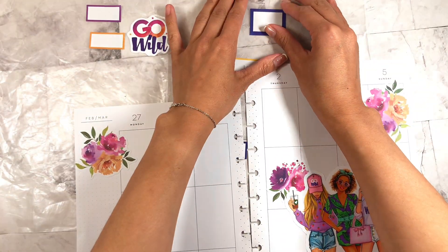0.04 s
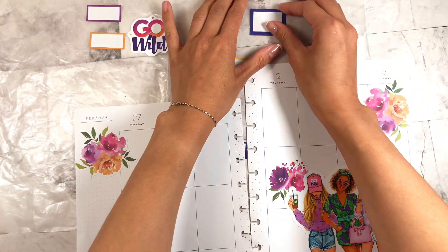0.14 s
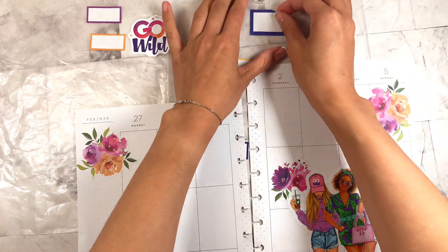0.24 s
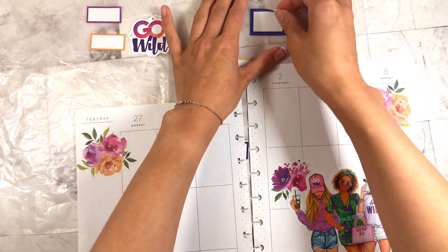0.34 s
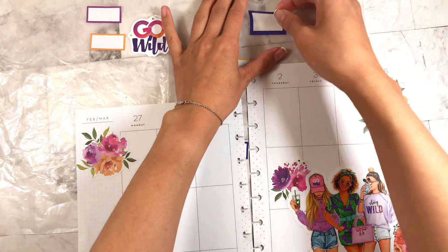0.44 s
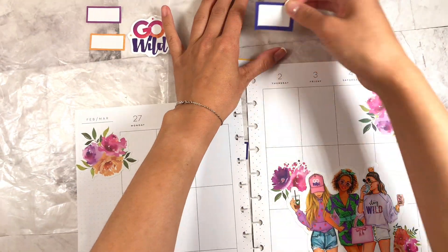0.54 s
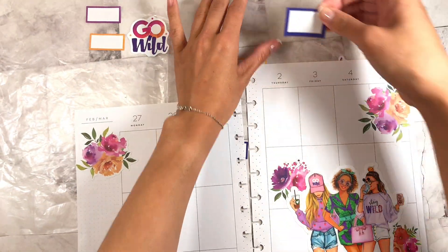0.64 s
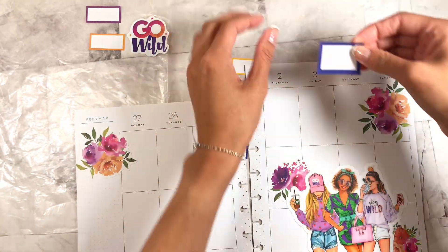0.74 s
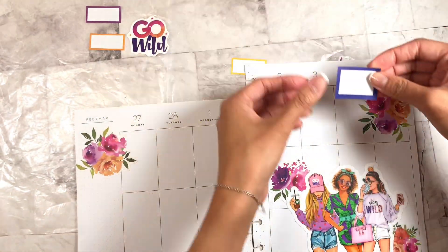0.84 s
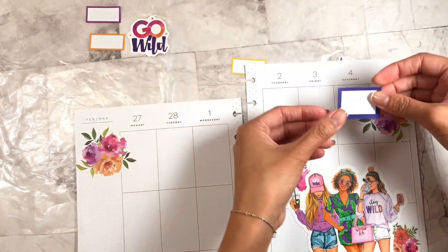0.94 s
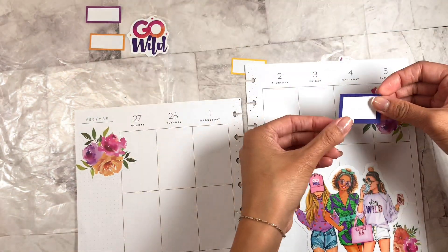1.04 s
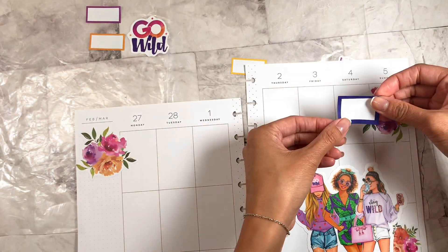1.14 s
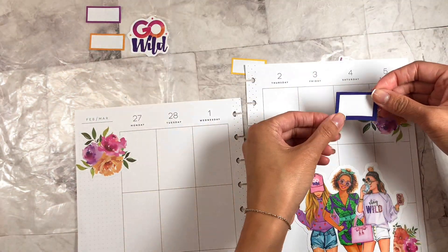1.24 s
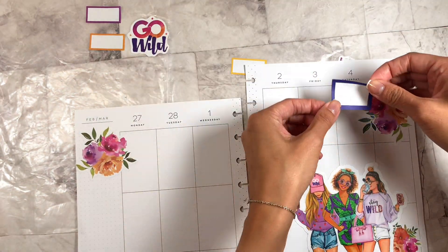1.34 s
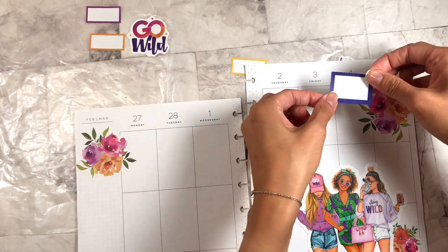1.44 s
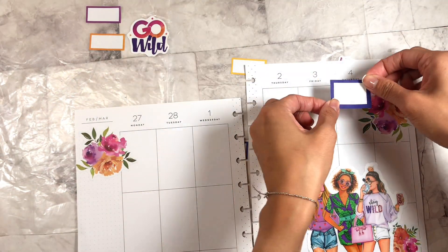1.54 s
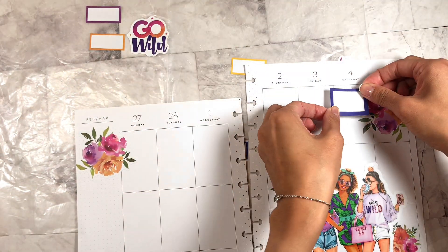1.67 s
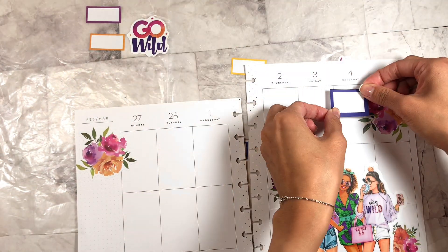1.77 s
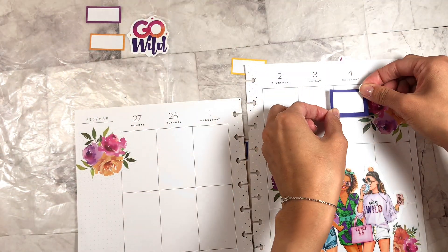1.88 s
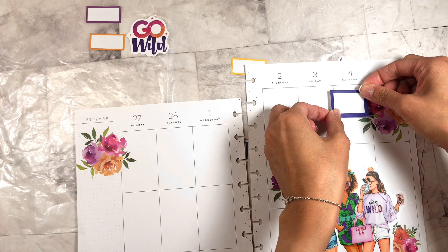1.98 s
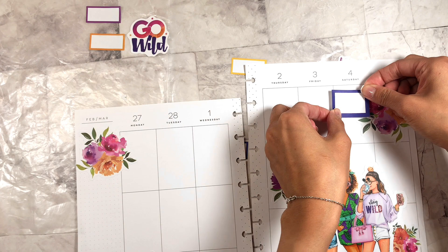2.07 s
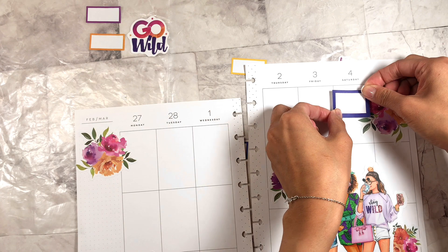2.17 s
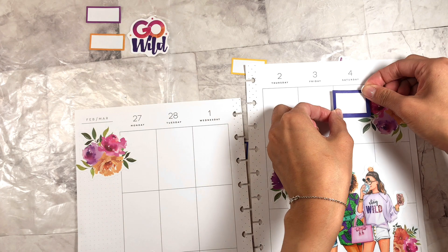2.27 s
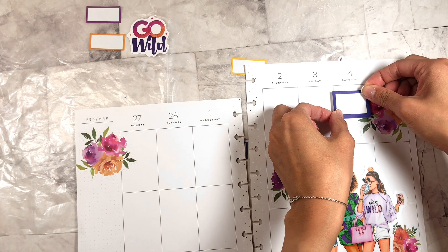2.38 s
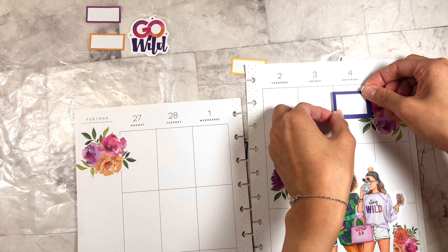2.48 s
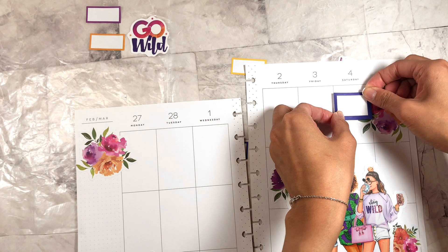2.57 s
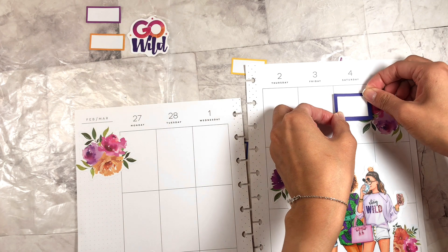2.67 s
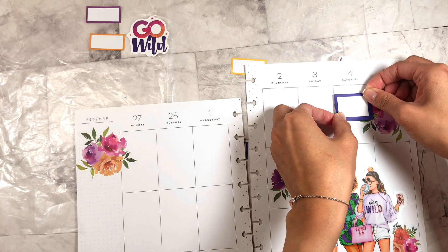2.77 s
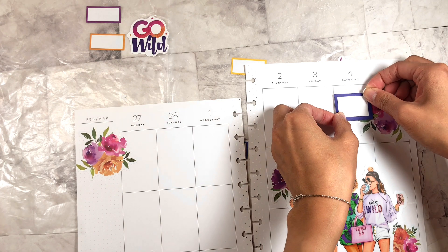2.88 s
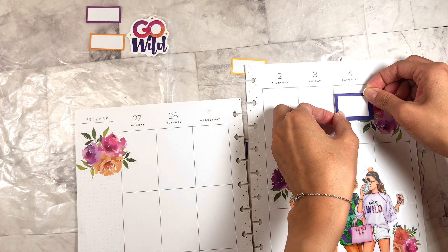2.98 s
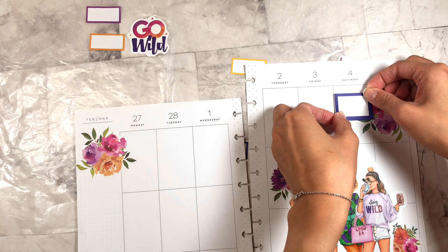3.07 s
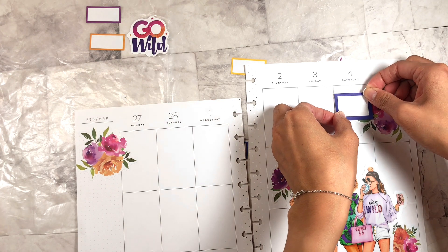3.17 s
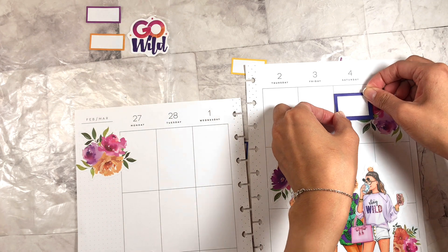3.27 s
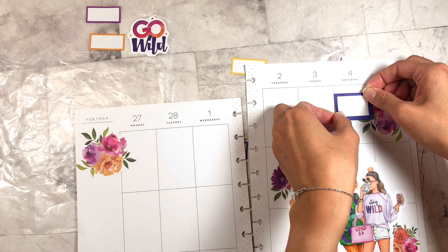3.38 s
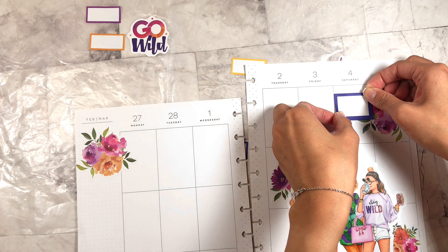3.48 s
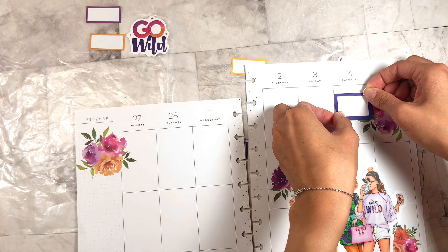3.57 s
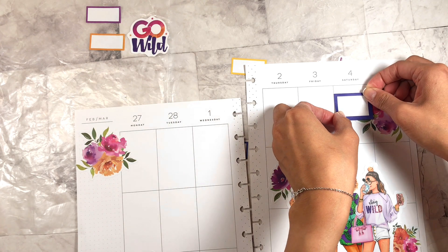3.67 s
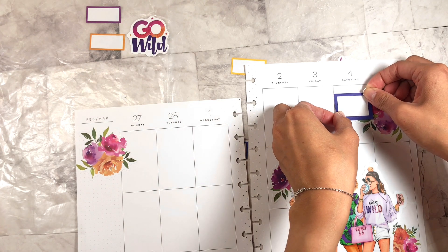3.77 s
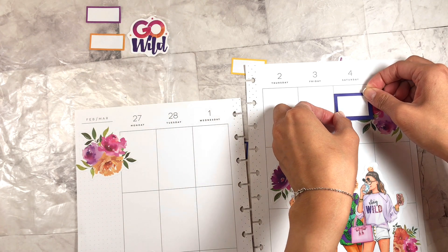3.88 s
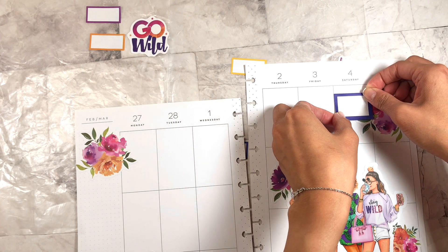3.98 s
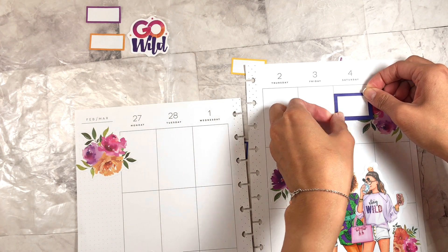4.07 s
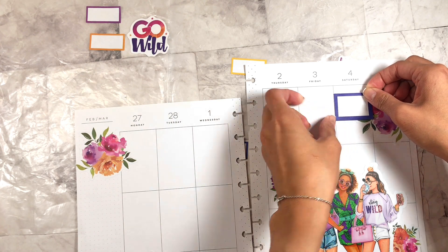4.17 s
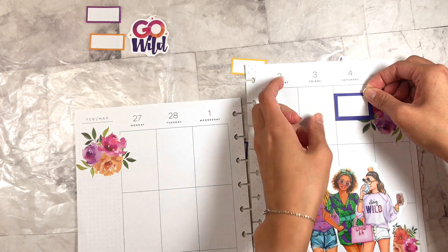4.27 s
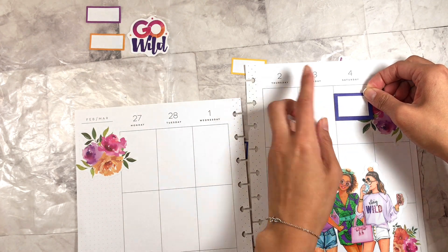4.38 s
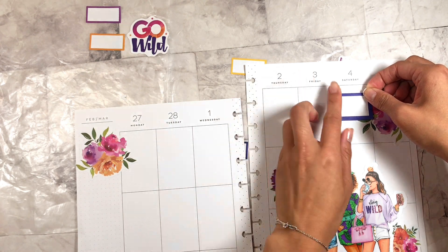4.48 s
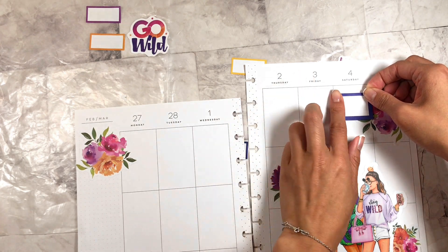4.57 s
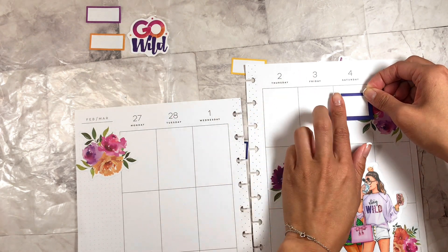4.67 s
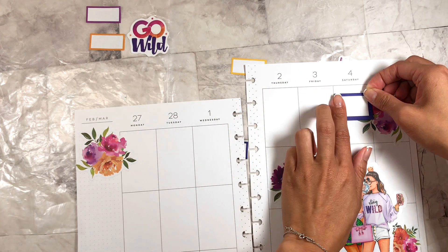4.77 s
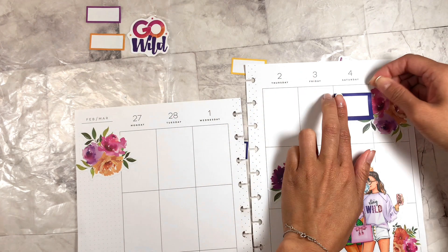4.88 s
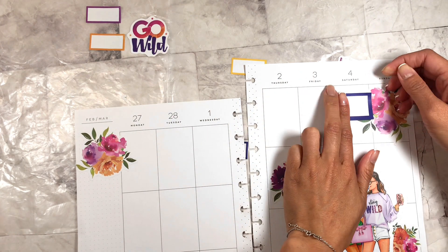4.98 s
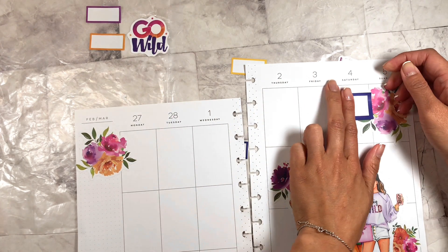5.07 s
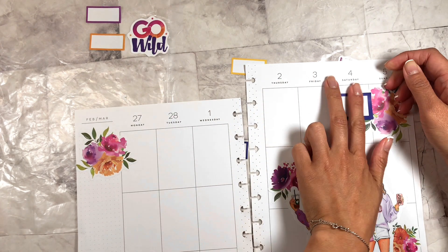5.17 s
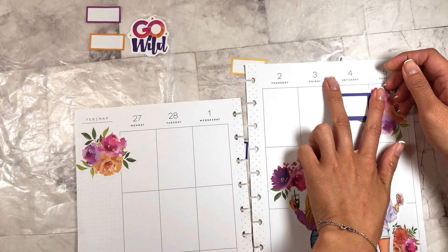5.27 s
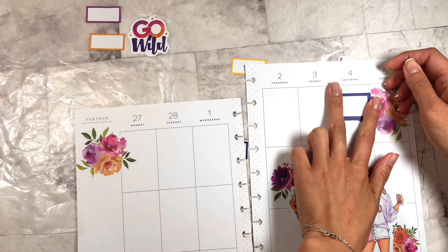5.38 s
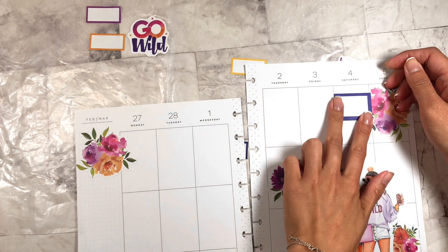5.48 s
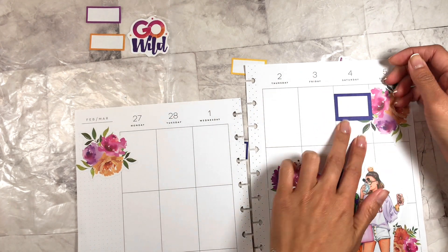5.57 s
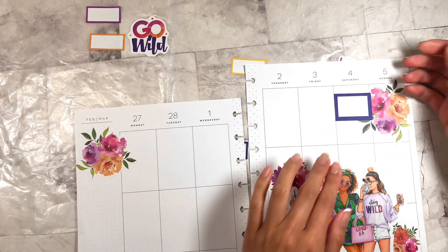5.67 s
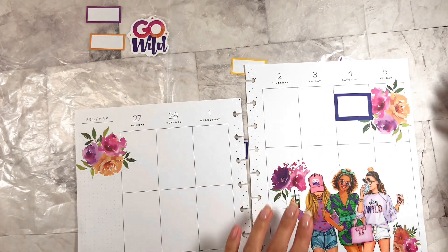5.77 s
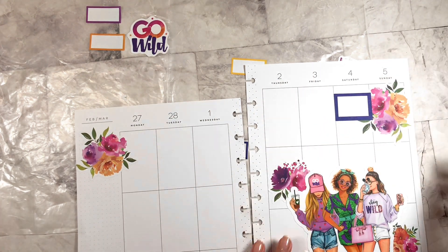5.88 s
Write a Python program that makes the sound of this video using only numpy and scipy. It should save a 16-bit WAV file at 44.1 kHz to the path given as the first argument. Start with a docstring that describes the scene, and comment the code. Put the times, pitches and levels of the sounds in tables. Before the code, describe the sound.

A fingernail clicks at the edge of a paper sticker over a crinkling backing sheet, then the sticker comes off in one short, bright rip. The stiff paper snaps a few times between the fingers. After a quieter stretch of faint ticks and soft table bumps, nails tap a planner page and fingertips rub the sticker flat with a fine hiss. It sounds close, in a small quiet room with a faint hum.

```python
"""A table in a small quiet room: a paper sticker is picked at and ripped off its backing sheet.
A nail ticks on its edge, then the glue lets go in stick-slip jerks that ring the flap and the sheet.
The loose sticker buckles and snaps between the fingers, is tapped onto a planner page and is rubbed
flat with a fine hiss. Hands bump the table softly; a faint mains hum lies under everything."""
import sys
import numpy as np
from scipy import signal
from scipy.fft import rfft, irfft
from scipy.io import wavfile
from scipy.ndimage import uniform_filter1d

SR = 44100
rng = np.random.default_rng(int(sys.argv[2]) if len(sys.argv) > 2 else 0)


def file_out(sig):
    """Save sig as 16-bit WAV at sys.argv[1]."""
    # one column per channel
    cols = np.atleast_2d(sig).T
    # limit, then scale
    lim = np.clip(cols, -1, 1)
    pcm = np.round(lim * 32767).astype(np.int16)
    wavfile.write(sys.argv[1], SR, pcm)


N = 261513
GRID_HZ = np.fft.rfftfreq(4096, 1 / SR)
KERNEL_SAMPLES = len(GRID_HZ)


def gain_of(db):
    """Decibels to amplitude."""
    return 10 ** (np.asarray(db) / 20)


def unit_rms(x):
    """Scales to rms 1."""
    return x / np.sqrt(np.mean(x ** 2) + 1e-20)


def with_energy(x, db):
    """Scales a short sound to a total energy."""
    return gain_of(db) * x / np.linalg.norm(x)


def curve_at(points, hz):
    """Interpolates (freq_hz, value) points on a log-frequency axis."""
    freq_hz, value = np.transpose(points)
    return np.interp(np.log(hz + 1), np.log(freq_hz + 1), value)


def coloured(x, colour, bright_db=0):
    """Minimum-phase filter of unit energy; bright_db tilts it about 6 kHz."""
    tilt_db = bright_db * np.tanh(np.log((GRID_HZ + 1) / 6000))
    log_gain = np.log(gain_of(curve_at(colour, GRID_HZ) + tilt_db))
    mirrored = np.concatenate([log_gain, log_gain[-2:0:-1]])
    response = np.exp(np.conj(signal.hilbert(mirrored)))[:len(GRID_HZ)]
    kernel = irfft(response)[:KERNEL_SAMPLES]
    return signal.fftconvolve(x, with_energy(kernel, 0))[:len(x)]


def ringing(x, modes):
    """The sound plus the decaying modes it excites."""
    t = np.arange(SR // 6) / SR
    ring = sum(gain_of(db - 60 * t / t60_s) * np.cos(2 * np.pi * hz * t) for hz, db, t60_s in modes)
    return x + signal.fftconvolve(x, ring)[:len(x)]


def grains(per_s, spread_db):
    """A random train of tiny clicks of uneven size."""
    size = gain_of(spread_db * np.minimum(rng.exponential(1, N), 4))
    return unit_rms(size * rng.standard_normal(N) * (rng.random(N) < per_s / SR))


def crack(crackle_s, crackle_db, flutter_db, flutter_s):
    """One sharp release, a quick crackle of fibres and a weaker flutter of the paper."""
    t = np.arange(KERNEL_SAMPLES) / SR
    signs = rng.choice([-1., 1.], (2, len(t)))
    crackle = signs[0] * np.exp(-t / crackle_s) * (1 - np.exp(-t / (0.44 * crackle_s)))
    flutter = signs[1] * np.exp(-t / flutter_s)
    burst = with_energy(crackle, crackle_db) + with_energy(flutter, flutter_db) - (t == 0)
    # whitened: the release feeds all bands evenly, the paper colours it afterwards
    power = uniform_filter1d(np.abs(rfft(burst, 4096)) ** 2, size=90)
    return coloured(burst, np.column_stack([GRID_HZ, -10 * np.log10(power)]))


def gesture(start_s, end_s, db, swell_db, release_s, attack_s):
    """Gain of one movement: sets in, swells to db at its end, falls 60 dB in release_s."""
    t = np.arange(N) / SR
    attack = np.clip((t - start_s) / attack_s, 0, 1)
    to_go = np.clip((end_s - t) / (end_s - start_s), 0, 1)
    after_s = np.maximum(t - end_s, 0)
    return attack * gain_of(db - swell_db * to_go - 60 * after_s / release_s)


def gestures(rows, attack_s):
    """Overlapping movements add in power."""
    return np.sqrt(sum(gesture(*row, attack_s) ** 2 for row in rows))


def background():
    """Steady room noise and mains hum."""
    # room noise spectrum: freq_hz, gain_db
    air_colour = [(15, -49.5), (25, -19), (43, 1), (66, 0), (84, -16.5), (102, -0.5), (120, -2.5),
                  (317, -7.5), (363, -11), (463, -11.5), (677, -16), (1650, -23.5), (9570, -27.5),
                  (14800, -37.5), (16000, -52.5)]
    # mains partials: freq_hz, rms_db
    partials = [(59.2, -78), (118.4, -78.5)]
    t = np.arange(N) / SR
    hum = sum(np.sqrt(2) * gain_of(db) * np.sin(2 * np.pi * (hz * t + rng.random()))
              for hz, db in partials)
    air_gain = gain_of(curve_at(air_colour, np.fft.rfftfreq(N, 1 / SR)))
    air = irfft(rfft(rng.standard_normal(N)) * air_gain, N)
    return gain_of(-69) * unit_rms(air) + hum


def reflections(x):
    """Scattered echoes from near walls; the low mids last longest."""
    # room decay: freq_hz, t60_s
    decay = [(200, .33), (800, 0.67), (2000, 0.21), (6000, .23), (14000, .18)]
    echoes = rng.standard_normal(SR // 2) * (rng.random(SR // 2) < 5000 / SR)
    hz, t, spectra = signal.stft(echoes, SR, nperseg=256)
    fade = gain_of(-60 * t / curve_at(decay, hz)[:, None])
    tail = signal.istft(spectra * fade, SR, nperseg=256)[1]
    tail *= np.minimum(np.arange(len(tail)) / SR / 0.009, 1)  # 9 ms build-up
    return signal.fftconvolve(x, with_energy(tail, db=-18))[:N]


def leaning():
    """The table rumbles dully as the forearms press and shift."""
    # arm movements: start_s, end_s, relative_db
    leans = [(-.05, .15, -68), (.3, 0.502, -62.5), (1.02, 1.55, -68.5), (1.699, 1.88, -68),
             (2.12, 2.45, -66), (4.75, 4.97, -69.5), (5.2, 5.9, -74.5)]
    # table response: freq_hz, gain_db
    table_colour = [(20, -35), (42, -6.5), (62, -1), (85, -2.5), (120, -1.5), (170, -15.5), (400, -27),
                    (1500, -60)]
    weight = sum(gesture(*lean, swell_db=1.5, release_s=0.45, attack_s=0.08) for lean in leans)
    return gain_of(-2.5) * weight * unit_rms(coloured(rng.standard_normal(N), table_colour))


def bumps():
    """Soft blows of the hands set the table and the planner swinging."""
    # hand landings: start_s, level_db, pitch_hz, t60_s
    landings = [(1.678, -50, 112.4, 0.4), (1.68, -55, 61.8, 0.39), (2.815, -60, 114.3, .2),
                (3.882, -62, 260, .06), (4.121, -59, 215.4, 0.1), (4.135, -60.5, 339, 0.068),
                (4.865, -53.5, 270, 0.074), (4.915, -54.5, 64, 0.13), (5.631, -51.5, 260, 0.061),
                (5.636, -44.5, 415, 0.021)]
    out, t = np.zeros(N), np.arange(SR // 2) / SR
    attack = 1 - np.exp(-t / 0.00078)
    for start_s, level_db, pitch_hz, t60_s in landings:
        swing = gain_of(level_db - 60 * t / t60_s) * np.sin(2 * np.pi * pitch_hz * t)
        add(out, start_s, swing * attack)
    return out


def rubbing():
    """Fingertips drag over paper fibres: a fine hiss that wavers with the pressure."""
    # fingertip slides: start_s, end_s, relative_db, swell_db, release_s
    strokes = [(1.12, 1.275, -67.5, 11, .3), (4.03, 4.17, -67.5, 10, 0.38), (4.2, 4.275, -65.5, 3, 0.44),
               (4.42, 4.55, -72.5, -2, .2), (4.67, 4.82, -68, -4, .4), (4.935, 5.19, -59.5, 2, 0.45),
               (5.185, 5.275, -53, 3, 0.24), (5.3, 5.63, -53, 6, 0.13)]
    # skin on paper: freq_hz, gain_db
    skin_colour = [(400, -10.5), (1000, -14.5), (1500, -12), (2150, -13), (2600, -7.5), (3000, -8),
                   (3900, -4), (5000, -2), (6700, -2), (7400, -3), (8200, -2.5), (11000, -8.5),
                   (14800, -17), (16000, -15.5)]
    waver = unit_rms(signal.oaconvolve(rng.standard_normal(N), np.hanning(1024), "same"))
    pressure = gain_of(0.74 * waver - 2) * gestures(strokes, attack_s=0.028)
    fibres = signal.stft(grains(per_s=16000, spread_db=-0.3), nperseg=512)[2]
    # the contact patch keeps changing, and its colour with it
    contact = uniform_filter1d(rng.standard_normal(fibres.shape), size=6, axis=0)
    contact = uniform_filter1d(contact, size=14, axis=1)
    hiss = signal.istft(fibres * gain_of(2.2 * unit_rms(contact)), nperseg=512)[1][:N]
    return pressure * unit_rms(coloured(hiss, skin_colour))


def taps():
    """Nails tick on the planner, damped by the stack of pages; longer touches are more scuff."""
    # nail touches: start_s, energy_db, bright_db, scuff_s, pitch_hz
    touches = [(1.666, -38.5, -11, .012, 3500), (1.706, -45.5, 0, .0034, 6880),
               (2.1555, -42.5, -2, .0015, 7520), (2.801, -47.5, -8, .004, 4500),
               (3.8611, -45, -17, .0013, 3000), (3.882, -41, -26.5, .004, 3510),
               (4.12, -30.5, 5, 0.0019, 6000), (4.232, -39.5, 5, 0.0011, 6500),
               (4.278, -35, 0, 0.0038, 5020), (4.433, -40, -4, .002, 4780), (4.491, -40, -16, .008, 3570),
               (4.541, -36.5, -3, 0.0065, 8000), (4.8401, -29.5, 2, 0.00097, 3980),
               (4.8726, -31, -3, 0.003, 8500), (4.877, -16, -1.5, 0.00064, 3650),
               (5.639, -26, 23, .004, 10500), (5.687, -34, 7, 0.0089, 6840)]
    # page response: freq_hz, gain_db
    page_colour = [(150, -20), (700, -24), (1400, -10.5), (2200, -15.5), (2700, -6), (3600, -4), (5300, 0),
                   (7200, -2.5), (8600, -2.5), (10500, -7.5), (13000, -17), (16000, -24)]
    out = np.zeros(N)
    for start_s, energy_db, bright_db, scuff_s, pitch_hz in touches:
        scuff_db = 14 * np.log10(scuff_s / 0.0011)
        touch = crack(scuff_s, crackle_db=scuff_db, flutter_db=-10.5, flutter_s=0.011)
        patch = ringing(touch, [(pitch_hz, -31, 0.008)])
        add(out, start_s, with_energy(coloured(patch, page_colour, bright_db), energy_db))
    return out


def snaps():
    """A patch of the stiff sticker creaks and pops over; held loosely, the whole sticker rings on."""
    # buckling patches: start_s, energy_db, bright_db, crackle_s, pitch_hz, ring_db
    buckles = [(0.8887, -21.5, 0, 0.0026, 3150, -2), (1.082, -34.5, -20, 0.0056, 2182, -16),
               (1.102, -39.5, -8, 0.005, 2200, -15), (1.3597, -21.5, 3.5, 0.0071, 6770, -11),
               (1.3662, -13.5, 0, 0.0013, 3350, -9), (1.3682, -8.5, -1, 0.0016, 6430, -0.5),
               (1.374, -20.5, -27, 0.0036, 1380, -12)]
    # sticker modes: freq_hz, relative_db, t60_s
    sticker_modes = [(1333, -48, 0.15), (1820, -44, .04), (2170, -52, 0.058), (2670, -44, 0.089),
                     (6600, -49, .05)]
    # flexing paper: freq_hz, gain_db
    flex_colour = [(120, -48), (350, -22), (520, -8), (1000, -14), (1450, -1), (2200, -1), (2800, -7.5),
                   (3400, -3), (5500, -5), (6900, -0.5), (8000, -7), (10500, -7), (13000, -18),
                   (16000, -26)]
    creak_db, creak_rise_s = -17, 0.0055  # fibres give a little before the snap
    out, pop = np.zeros(N), signal.unit_impulse(KERNEL_SAMPLES)
    lead_s = np.arange(-KERNEL_SAMPLES, 0) / SR
    for start_s, energy_db, bright_db, crackle_s, pitch_hz, ring_db in buckles:
        creak = rng.standard_normal(len(lead_s)) * np.exp(lead_s / creak_rise_s)
        creak = coloured(creak, flex_colour, bright_db)
        add(out, start_s + lead_s[0], with_energy(creak, energy_db + creak_db))
        crackle = crack(crackle_s, crackle_db=9.5, flutter_db=-8, flutter_s=0.013)
        patch = ringing(crackle, [(pitch_hz, -31, 0.009)])
        # the pop alone drives the sticker modes
        ring = ringing(pop, [(hz, db + ring_db, t60_s) for hz, db, t60_s in sticker_modes]) - pop
        snap = coloured(with_energy(patch, 0) + ring, flex_colour, bright_db)
        add(out, start_s, with_energy(snap, energy_db))
    return out


def nail_tick():
    """The nail slips off the paper's edge."""
    return crack(crackle_s=0.0008, crackle_db=-2, flutter_db=-8, flutter_s=0.0065)


def picking():
    """Dry nail ticks, a few strong and many faint, over the crinkle of the backing sheet."""
    # nail catches the edge: start_s, energy_db, bright_db
    picks = [(.0108, -34.5, -3), (.0323, -32, -13.5), (0.1296, -4.5, -.5), (.1371, -20, 2), (.174, -28, 1),
             (0.2142, -21, 1), (.2294, -7, 2), (.253, -24.5, -7), (.2713, -25, 3), (.2947, -20, 0.5),
             (0.3076, -23, 3.5), (0.3135, -19.5, .5), (.571, -28, 5), (0.639, -31.5, -3), (.652, -36, -13)]
    # fingers crinkle the sheet: start_s, end_s, relative_db, swell_db, release_s
    crinkles = [(-.02, .035, -61.5, 1.5, 0.33), (.07, .2, -55, 4, 0.76), (.2, .335, -51, 2, 0.17),
                (.5, .56, -56, 2, 0.28), (.6, .74, -70, 1, .25)]
    # nail on paper: freq_hz, gain_db
    nail_colour = [(150, -31.5), (900, -27.5), (1500, -20), (2300, -20), (4000, -11), (6300, -3.5),
                   (9200, 0), (11000, -9), (12300, -7), (16000, -21)]
    # sheet rustle: freq_hz, gain_db
    rustle_colour = [(100, -16), (230, -6), (360, -10.5), (540, -2.5), (760, -12), (1160, -12.5),
                     (1650, -4), (2400, -4), (5000, -2), (8300, -2), (11000, -6.5), (16000, -16.5)]
    rustle = unit_rms(coloured(grains(per_s=4000, spread_db=1.5), rustle_colour))
    tick_train = signal.fftconvolve(grains(per_s=250, spread_db=0.5), nail_tick())[:N]
    faint_ticks = unit_rms(coloured(tick_train, nail_colour))
    out = gestures(crinkles, attack_s=0.035) * (gain_of(-1.36) * rustle + gain_of(-6) * faint_ticks)
    for start_s, energy_db, bright_db in picks:
        add(out, start_s, with_energy(coloured(nail_tick(), nail_colour, bright_db), energy_db))
    return out


def flap_and_sheet(x, flap_hz):
    """The lifted flap and the taut backing sheet pass each jolt on and ring briefly."""
    # modes of the sheet and the table under it: freq_hz, relative_db, t60_s
    sheet_modes = [(225, -27.5, 0.26), (526, -31.5, .16), (894.7, -29, 0.049), (3290, -27, 0.033),
                   (4650, -22, .02), (5943, -14.5, .017), (6750, -25, .016)]
    # rip spectrum: freq_hz, gain_db
    rip_colour = [(60, -32.5), (100, -26), (160, -31), (330, -29.5), (500, -20), (680, -29), (870, -20.5),
                  (1200, -25), (2400, -18.5), (3100, -10), (5000, -7), (6100, -2), (11000, -10.5),
                  (16000, -20)]
    flap = ringing(x, [(flap_hz, -27, 0.004)])
    sheet_ring = ringing(flap, sheet_modes) - flap
    return coloured(flap + gain_of(-22) * sheet_ring, rip_colour)


def peel():
    """Stick-slip: the glue gives in jerks, each trailed by fine tearing that grows as the pull quickens."""
    # strongest jerks of the glue: start_s, energy_db
    slips = [(0.337, -1), (0.3461, -5.5), (0.3558, -4), (.359, -5.5), (0.369, -3.5), (0.3757, -6.5),
             (0.3885, -4), (.3955, -2.5), (0.3999, -3.5), (.409, 0), (.4129, 2.5), (0.4185, -2.5),
             (.4269, -3.5), (0.4312, .5), (0.4404, -1.5), (0.4446, -3.5), (0.4491, -1), (0.4612, -0.5),
             (.4705, 0), (0.4753, -1), (0.483, 0.5), (0.4867, -1), (0.4907, 1), (0.4954, 2.5),
             (0.5025, -1.5), (.5072, 0)]
    pull_start_s, pull_end_s = 0.335, 0.508
    flap_start_hz, flap_end_hz = 5530, 3280  # falls as the flap lengthens
    stick_db_per_s = 800.5  # tearing fades until the glue holds again
    pull = gesture(pull_start_s, pull_end_s, db=-23.5, swell_db=12, release_s=0.025, attack_s=0.0084)
    t, jerks_s = np.arange(N) / SR, np.sort([start_s for start_s, _ in slips])
    last_jerk = np.maximum(np.searchsorted(jerks_s, t) - 1, 0)
    sticking = gain_of(-stick_db_per_s * np.abs(t - jerks_s[last_jerk]))
    tearing = unit_rms(flap_and_sheet(grains(per_s=4500, spread_db=2.5), flap_end_hz))
    out = pull * sticking * tearing
    for start_s, energy_db in slips:
        lifted = np.clip((start_s - pull_start_s) / (pull_end_s - pull_start_s), 0, 1)
        # later jerks tear a wider strip of glue: more crackle, brighter
        crackle_db = 14.5 - 7.2 * (1 - lifted) ** 2
        treble_db = -0.9 + 3.5 * lifted ** 2
        flap_hz = flap_start_hz * (flap_end_hz / flap_start_hz) ** (lifted ** 0.8)
        jolt = crack(0.0007, crackle_db, flutter_db=crackle_db - 6, flutter_s=0.0047)
        strip_modes = [(hz, -34, 0.01) for hz in rng.uniform(3300, 7500, size=2)]
        jolt = flap_and_sheet(ringing(jolt, strip_modes), flap_hz)
        jolt = coloured(jolt, [(6500, 0), (9500, treble_db)])
        add(out, start_s, with_energy(jolt, energy_db))
    return out


def add(mix, start_s, sound):
    """Mixes a sound in at start_s."""
    part = mix[max(round(start_s * SR), 0):][:len(sound)]
    part += sound[:len(part)]


def scene():
    """The handling, its reflections and the background, in mono."""
    hands = peel() + picking() + snaps() + taps() + rubbing() + bumps() + leaning()
    return (hands + reflections(hands) + background())[None]


def record(dry):
    """Low cut and band limit."""
    low_cut_hz, band_edge_hz = 36, 15900
    highpass = signal.butter(4, low_cut_hz, "high", fs=SR, output="sos")
    lowpass = signal.firwin(255, band_edge_hz, window=("kaiser", 8), fs=SR)
    return signal.oaconvolve(signal.sosfilt(highpass, dry), lowpass[None], "same")


dry = scene()
out = record(dry)
file_out(out)
```